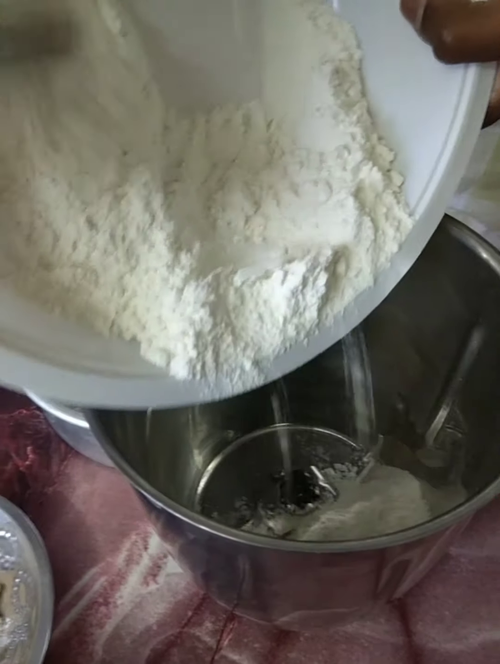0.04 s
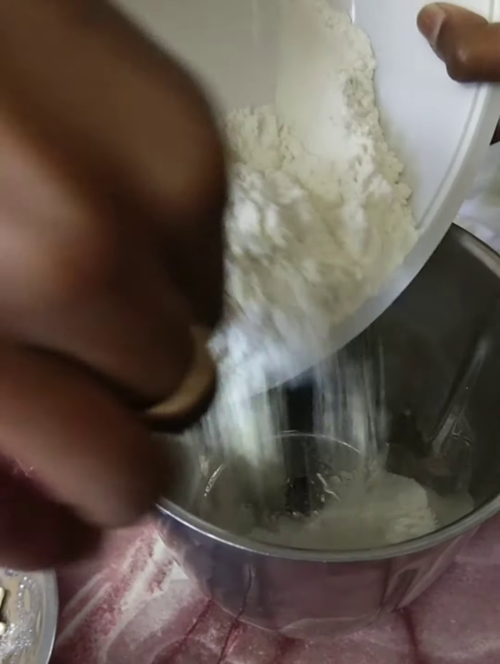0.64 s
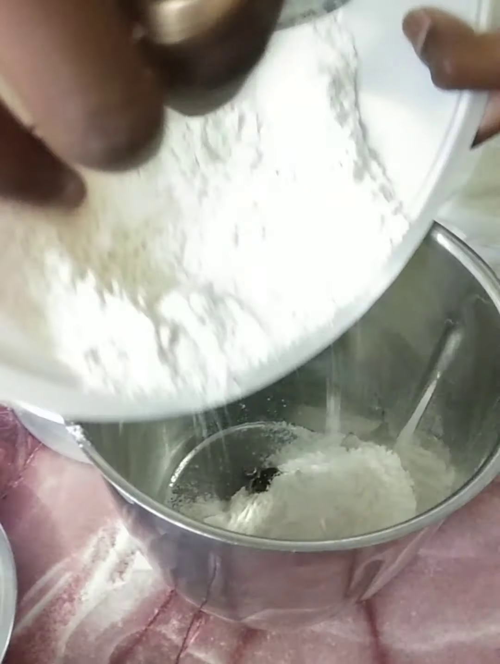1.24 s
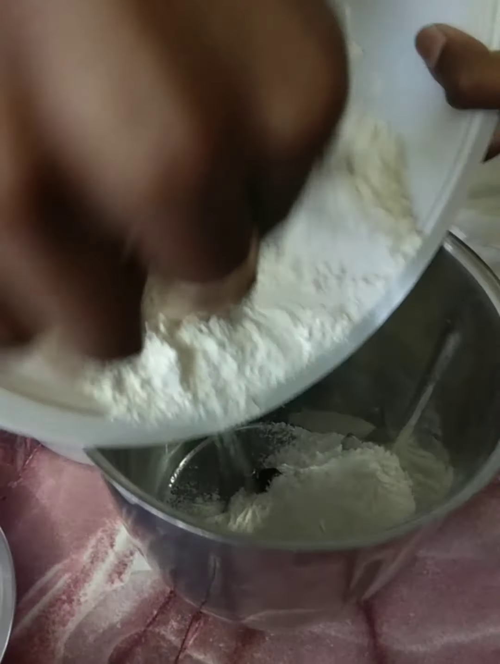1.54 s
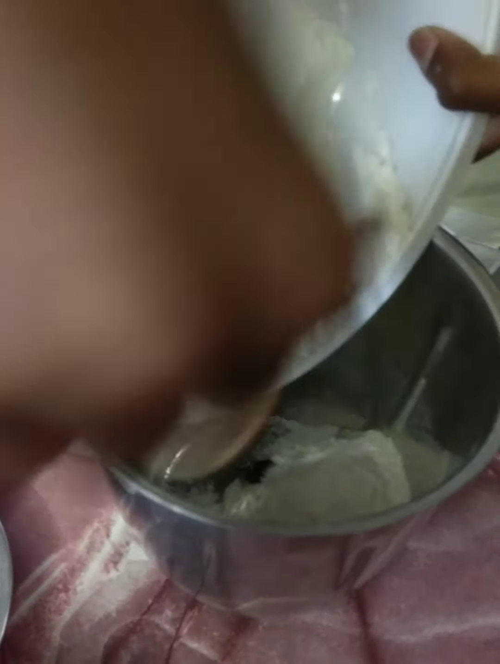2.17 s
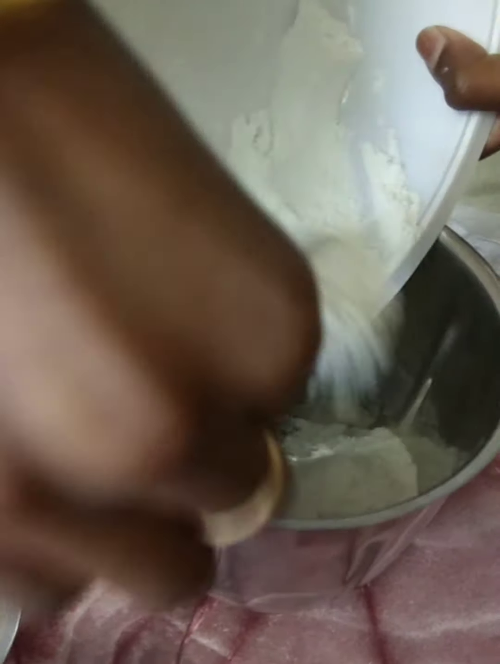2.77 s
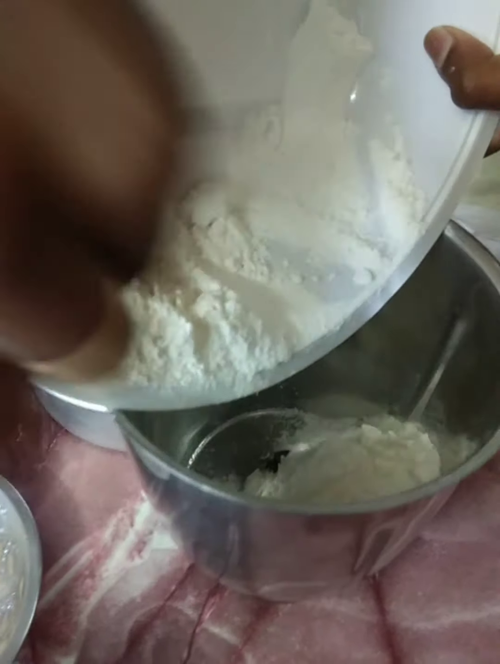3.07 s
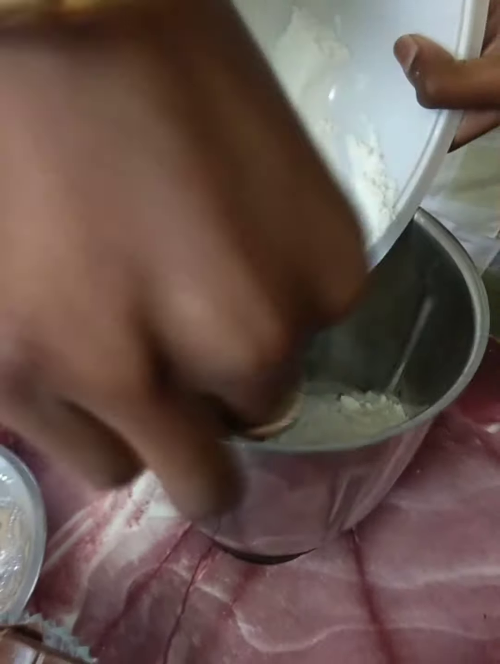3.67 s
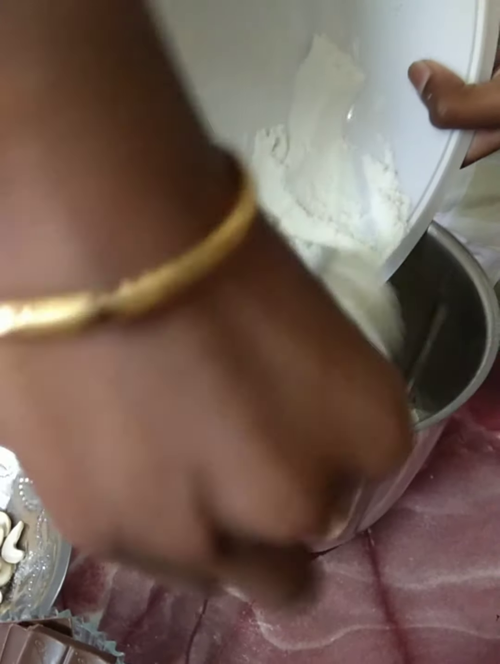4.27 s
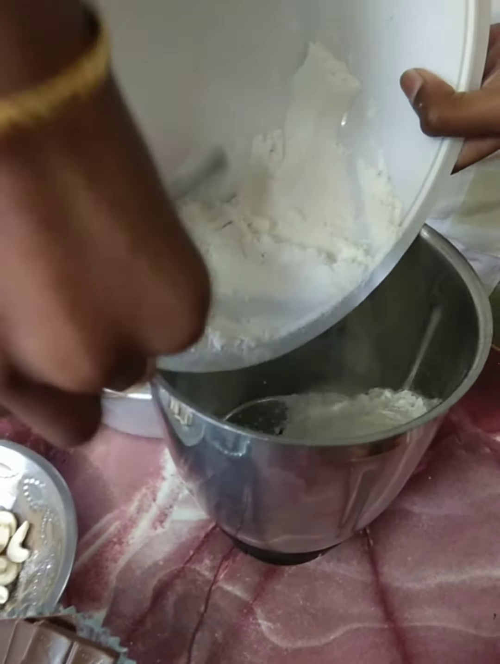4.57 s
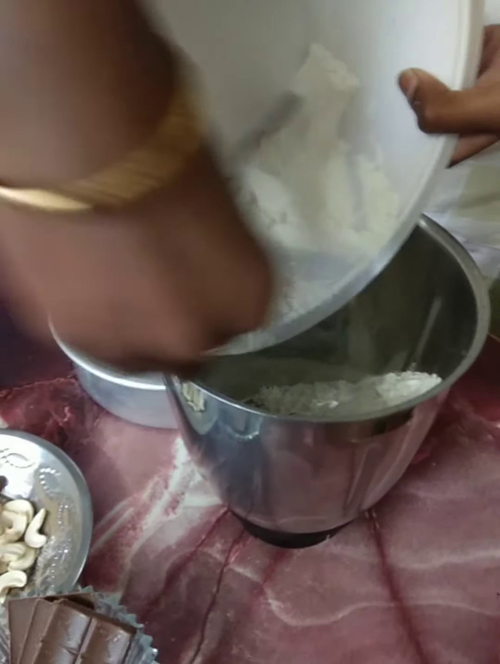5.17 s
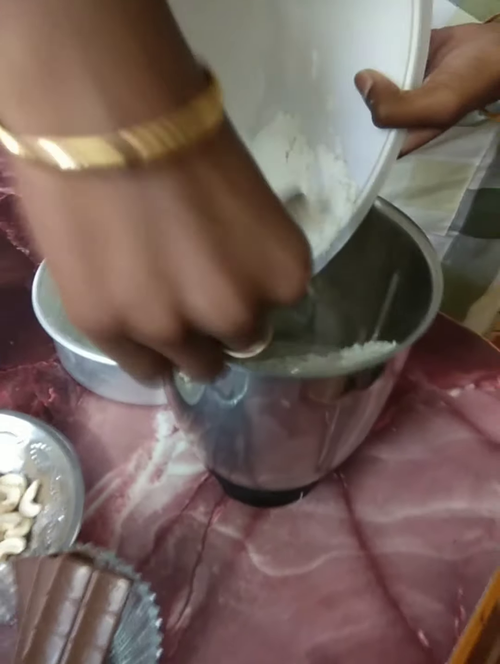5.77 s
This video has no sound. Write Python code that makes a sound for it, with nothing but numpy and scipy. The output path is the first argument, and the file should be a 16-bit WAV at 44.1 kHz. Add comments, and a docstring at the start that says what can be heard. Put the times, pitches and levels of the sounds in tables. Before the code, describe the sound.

Close up in a small kitchen, a spoon scoops flour from a plastic bowl into a stainless steel jar. Short, juddering scrapes with a gritty hiss alternate with uneven hollow knocks, plastic clacks and brief steel rings. The loudest clatter comes a little before halfway, followed by a thin, high squeal. More knocks and scrapes follow, one with a low thud into the worktop. Hard walls add a short echo over a very quiet background.

```python
"""A spoon scoops flour from a tilted plastic bowl into a stainless steel jar, close up in a small kitchen.
It judders over the plastic and shears the powder with a gritty hiss. Spoon, bowl and jar collide in
hollow knocks, plastic clacks and short steel rings; the hardest blows thud into the worktop.
The bowl rubs in the hand; there are faint squeaks, one steel squeal and one slide of loose flour.
Hard kitchen walls answer every blow, over a very quiet room tone."""
import sys
import numpy as np
from scipy import signal
from scipy.fft import rfft, irfft, next_fast_len
from scipy.io import wavfile
from scipy.ndimage import uniform_filter1d, map_coordinates

SR = 44100
rng = np.random.default_rng(int(sys.argv[2]) if len(sys.argv) > 2 else 0)


def generate_wav(sig):
    """Save sig (samples, or channels by samples) to the path in sys.argv[1] as 16-bit PCM at SR."""
    pcm = np.round(np.clip(np.atleast_2d(sig).T, -1, 1) * 32767).astype(np.int16)
    wavfile.write(sys.argv[1], SR, pcm)


N = 261072


def amp(db):
    """Decibels to gain."""
    return 10 ** (np.asarray(db) / 20)


def unit(x):
    """Scale to rms 1."""
    return x / np.sqrt(np.mean(x ** 2) + 1e-20)


def struck(x, size=512):
    """Scale a hit so that its attack has rms 1."""
    return x / np.sqrt(np.mean(x[:size] ** 2) + 1e-20)


def along(points, hz):
    """Read a (frequency, value) curve on a log axis."""
    knots_hz, values = np.transpose(points)
    return np.interp(np.log(hz + 1), np.log(knots_hz + 1), values)


def wobble(rate):
    """Smooth random modulation, rate knots a second."""
    return map_coordinates(rng.standard_normal(int(N * rate / SR) + 4), [np.arange(N) * rate / SR])


def filtered(x, response):
    """Apply a complex frequency response."""
    n = x.shape[-1]
    size = next_fast_len(n + SR // 10)
    return irfft(rfft(x, size) * response(np.fft.rfftfreq(size, 1 / SR)), size)[..., :n]


def coloured(x, spectrum, size=4096):
    """Minimum-phase EQ: shapes the tone without pre-ringing."""
    cepstrum = irfft(np.log(amp(along(spectrum, np.fft.rfftfreq(size, 1 / SR)))))
    cepstrum[1:size // 2] *= 2
    cepstrum[size // 2 + 1:] = 0
    return signal.oaconvolve(x, irfft(np.exp(rfft(cepstrum))))[:len(x)]


def gesture(start, length, attack, swell_db, t60):
    """Envelope of one movement: an attack, an arched hold and a dying release."""
    t = np.arange(N) / SR - start
    arch = np.sin(np.pi * np.clip(t / length, 0, 1))
    return np.clip(t / attack, 0, 1) * amp(swell_db * (arch - 1) - 60 * np.maximum(t - length, 0) / t60)


def ring(modes, t, scatter_db):
    """Decaying (Hz, dB, t60) modes whose strengths vary with where the blow lands."""
    hz, db, t60 = np.transpose(modes)[:, :, None]
    strength_db = db + scatter_db * rng.standard_normal(hz.shape)
    polarity = (-1) ** np.arange(len(hz))[:, None]
    attack = 1 - np.exp(-t / 0.0004)
    partials = polarity * amp(strength_db - 60 * t / t60) * np.sin(2 * np.pi * hz * t)
    return attack * partials.sum(axis=0)


def chatter(t, length, t60, rate=2500):
    """A tap and a brief rattle of uneven contacts that dies away."""
    taps = (rng.random(len(t)) < rate / SR) * rng.standard_normal(len(t))
    taps += 0.02 * rng.standard_normal(len(t))
    taps[0] = 0.65
    return taps * amp(-60 * np.maximum(t - length, 0) / t60)


def slips(rate, spread_db, smooth):
    """Stick-slip friction: tiny impulses of uneven size over an even rub."""
    grains = (rng.random(N) < rate / SR) * rng.standard_normal(N)
    grains *= amp(spread_db * rng.standard_normal(N))
    return unit(grains) + smooth * rng.standard_normal(N)


def roaming(x, patchy_db, size=9):
    """Resonances come and go as the point of contact travels."""
    spectra = signal.stft(x, nperseg=512)[2]
    patches = uniform_filter1d(rng.standard_normal(spectra.shape), size // 2, axis=0)
    patches = uniform_filter1d(patches, 4 * size, axis=1)
    return unit(signal.istft(spectra * amp(patchy_db * unit(patches)), nperseg=512)[1][:N])


# Reverb decay of the kitchen: (frequency [Hz], t60 [s])
KITCHEN_DECAY = [(100, 0.51), (500, 0.33), (1500, 0.3), (4000, 0.28), (12000, 0.3), (16000, 0.11)]
def placed(x, wet_db, lag_s):
    """Sound arrives on the right first; the kitchen adds a diffuse tail to each side."""
    hz, t, noise = signal.stft(rng.standard_normal((2, SR * 3 // 5)), SR, nperseg=256)
    decay = amp(-60 * t / along(KITCHEN_DECAY, hz)[:, None])
    build_up = 1 - np.exp(-t / 0.0019)
    tail = signal.istft(noise * decay * build_up, SR, nperseg=256)[1]
    room = signal.fftconvolve(x[None], tail, axes=1)[:, :len(x)]
    room *= np.linalg.norm(x) / (np.linalg.norm(room, axis=1, keepdims=True) + 1e-20)
    direct = filtered(x, lambda hz: np.exp(np.outer([-1, 1], 1j * np.pi * hz * lag_s)))
    return direct + amp(wet_db) * room


def cupped(x, depth, count, delay_s=0.004):
    """The walls of bowl and jar send each side its own early reflections."""
    delays = rng.uniform(0.1, 1, (2, count)) * delay_s
    gains = depth * rng.choice([-1, 1], (2, count)) / np.sqrt(count)
    echoes = np.zeros((2, SR // 20))
    np.put_along_axis(echoes, np.round(delays * SR).astype(int), gains, axis=1)
    return signal.oaconvolve(x[None], echoes, axes=1)[:, :len(x)]


def travelling(low, bright, size=8192):
    """The spoon moves, so its echoes keep changing; only the bright layer gets early reflections."""
    out, hop = np.zeros((2, N + 2 * SR)), size // 2
    window = np.sqrt(signal.get_window("hann", size))
    padded = np.pad([low, bright], ((0, 0), (hop, size)))
    for start in range(0, N + hop, hop):
        dull, sharp = np.pad(padded[:, start:start + size] * window, ((0, 0), (0, SR // 3)))
        piece = placed(dull + sharp, wet_db=0.5, lag_s=0.0002416) + cupped(sharp, depth=2.01, count=24)
        out[:, start:start + piece.shape[1]] += piece
    return out[:, hop:hop + N]


# Spoon strokes, levels before the layer trims:
# (start [s], length [s], attack [s], drag [dB], wall's share of the drag [0-1], rasp [dB], hiss [dB])
SPOON_STROKES = [(-0.04, 0.075, 0.014, -36.5, 0.96, -43, -46),
                 (0.018, 0.21, 0.022, -49.5, 0.9, -57.5, -52.5),
                 (1.341, 0.2, 0.022, -53, 0.2, -57.5, -48.5), (1.534, 0.15, 0.027, -57, 0.53, -59, -57),
                 (2.014, 0.13, 0.11, -48.5, 0.7, -45, -37), (2.451, 0.08, 0.023, -34.5, 0.55, -39, -34.5),
                 (2.564, 0.19, 0.047, -53.5, 0.1, -59, -53), (3.44, 0.15, 0.079, -50, 0.67, -59.5, -40.5),
                 (3.924, 0.092, 0.026, -51, 0.63, -59, -43.5), (4.017, 0.15, 0.017, -47, 0.62, -58, -44.5),
                 (4.173, 0.058, 0.036, -47.5, 0.35, -45, -39.5),
                 (4.237, 0.024, 0.021, -49, 0.1, -49, -54.5), (4.629, 0.19, 0.12, -48, 0.1, -46, -40.5),
                 (5.06, 0.19, 0.014, -47, 0.07, -58, -46), (5.182, 0.11, 0.023, -45.5, 0.36, -45.5, -47),
                 (5.265, 0.14, 0.027, -46, 0.13, -45.5, -42), (5.565, 0.16, 0.077, -40, 0.18, -45.5, -40)]
# The bowl slides on the jar's rim, sounding the hollow: (start [s], length [s], level before trim [dB])
RIM_SLIDES = [(0.405, .17, -64), (0.62, 0.58, -66), (1.035, 0.13, -64.5), (4.257, 0.11, -51),
              (5.848, 0.07, -57.5)]
# EQ of the hollow, the bowl's wall, the spoon's rasp and the powder's hiss: (frequency [Hz], level [dB])
HOLLOW_EQ = [(60, -54.5), (330, -19.5), (410, -6.5), (480, 5), (550, 3.5), (650, -9), (900, -37.5),
             (2000, -52.5), (10000, -100)]
WALL_EQ = [(60, -64), (300, -33), (560, -10.5), (700, -2), (800, 2), (900, -1.5), (1080, -17),
           (2000, -37.5), (10000, -100)]
RASP_EQ = [(100, -69.5), (500, -27.5), (1050, -15), (1450, 3.5), (1950, -1.5), (2400, -1), (2800, -4.5),
           (3200, -10), (4400, -9.5), (6000, -38.5), (16000, -80.5)]
POWDER_EQ = [(100, -71), (900, -47), (2500, 1), (3600, 0.5), (4700, 7.5), (6000, 6), (9000, 6),
             (11000, 6.5), (12300, 6), (14000, 5.5), (16000, -5)]
def scraping(swell_db=6, release_t60=0.13):
    """The spoon judders over plastic and shears powder, giving a low drag and a bright rasp and hiss."""
    hollow, wall, rasp, hiss = np.zeros((4, N))  # envelopes
    for start, length, attack, drag_db, wall_share, rasp_db, hiss_db in SPOON_STROKES:
        pressure = gesture(start, length, attack, swell_db, release_t60)
        hollow += amp(drag_db) * np.sqrt(1 - wall_share) * pressure
        wall += amp(drag_db) * np.sqrt(wall_share) * pressure
        rasp += amp(rasp_db) * pressure
        hiss += amp(hiss_db) * pressure
    for start, length, db in RIM_SLIDES:
        hollow += amp(db) * gesture(start, length, attack=0.0072, swell_db=swell_db, t60=release_t60)
    judder = wobble(70)
    rub = slips(rate=500, spread_db=3, smooth=0.22)
    body = hollow * unit(coloured(rub, HOLLOW_EQ)) + wall * unit(coloured(rub, WALL_EQ))
    drag = amp(-4.5) * unit(amp(2 * judder)) * body
    grit = amp(2 * judder) * coloured(slips(rate=1000, spread_db=1, smooth=0.43), RASP_EQ)
    edge = amp(-6) * rasp * roaming(grit, patchy_db=2.5)
    grains = amp(judder) * coloured(slips(rate=3000, spread_db=2.5, smooth=0.25), POWDER_EQ)
    powder = amp(-11) * hiss * roaming(grains, patchy_db=2.7)
    return drag, edge + powder


# EQ of the background: (frequency [Hz], level [dB])
ROOM_TONE_EQ = [(25, -30.5), (120, -9), (320, -10.5), (480, -1.5), (700, -21), (1200, -14), (4000, -25.5),
                (9000, -25.5), (12000, -15), (13500, -38), (16000, -41.5)]
def room_tone():
    """A very quiet, wide bed of noise with a hollow colour."""
    return amp(-80) * unit(np.array([coloured(rng.standard_normal(N), ROOM_TONE_EQ) for _ in range(2)]))


# The spoon snags in mid-stroke: (time [s], level before trim [dB])
SPOON_CATCHES = [(0.011, -59), (0.063, -49), (0.152, -54), (0.186, -55), (0.232, -54), (2.068, -41),
                 (2.106, -45), (2.161, -55.5), (3.474, -73), (3.529, -57), (4.72, -48), (5.3, -48),
                 (5.338, -53), (5.607, -48)]
# EQ of a snag: (frequency [Hz], level [dB])
CATCH_EQ = [(300, -33.5), (800, -4), (1400, 3), (2600, 2), (5000, -15), (13000, -17), (16000, -24)]
def catches():
    """Short bursts of grit where the edge of the spoon sticks and jumps."""
    out, t = np.zeros(N + SR), np.arange(SR // 10) / SR
    for time, db in SPOON_CATCHES:
        grit = coloured(chatter(t, length=0.011, t60=0.018), CATCH_EQ)
        out[round(time * SR):][:len(t)] += amp(db - 4) * struck(grit)
    return out[:N]


def knock(modes, pitch_hz, t, grip=0.2):
    """A short, hollow note; the grip of the hand damps each mode differently every time."""
    soft_wall = signal.butter(2, (200, 1700), "bandpass", fs=SR, output="sos")
    tuned = [(ratio * pitch_hz, db, t60 * np.exp(grip * rng.standard_normal()))
             for ratio, db, t60 in modes]
    return struck(signal.sosfilt(soft_wall, ring(tuned, t, scatter_db=1.5)))


CONTACT_S = 0.0025  # how long a contact chatters at full strength
# Hits of spoon, bowl and jar; the pitches move as the bowl tilts. Levels before the layer trims:
# (time [s], hollow [Hz], hollow [dB], wall [Hz], wall [dB], clack [dB], click [dB], leftward pan [dB])
HITS = [(0.031, 513, -63, 810, -54, -45, -72, -15), (0.056, 506, -62, 820, -63, -54, -87, -8),
        (0.618, 454, -47, 710, -56, -80, -79, -6), (0.997, 535, -49.5, 766, -52.5, -69, -77.5, -4),
        (1.025, 532, -48.5, 689, -55, -80, -71.5, -1), (1.102, 537, -58, 690, -62.5, -80, -101.5, -8),
        (1.222, 493, -47, 656, -52, -58, -84, -9), (1.291, 534, -47, 796, -38.5, -28.5, -39, -7),
        (1.348, 487.5, -33.5, 640, -44, -31.5, -29, -4), (1.476, 448, -51, 756, -54, -52, -77, -13),
        (1.578, 437, -47, 765, -48.5, -49, -60.5, -10), (2.0, 524, -47.5, 713, -45, -30.5, -40.5, -4),
        (2.235, 443.5, -50, 776, -48.5, -53, -57, -9.5), (2.285, 462, -54, 730, -60.5, -64.5, -70.5, -0.5),
        (2.412, 453, -28, 706, -20, -17.5, -16.5, 2.5), (2.4163, 492, -16.5, 793, -29.5, -18, -18, -3),
        (2.425, 490.3, -24, 900, -32, -25, -24, -2), (2.611, 465, -40.5, 746, -42.5, -38, -42, -9),
        (2.831, 452, -45, 795, -49, -51.5, -64, -8), (2.897, 528, -55.5, 731, -57.5, -65, -80, -3),
        (3.053, 479, -25.5, 713, -30, -26.5, -40.5, -6), (3.423, 476, -60.5, 720, -64, -68.5, -49.5, -5),
        (3.884, 496, -42.5, 800, -40, -35.5, -39.5, -13), (3.891, 445, -38.5, 810, -36, -36.5, -32.5, 1.5),
        (4.269, 510, -41, 733, -49.5, -46.5, -53.5, -5.5), (4.513, 485, -28.5, 783, -25, -22.5, -19.5, -4),
        (4.544, 454, -45, 830, -41, -31.5, -48, 10), (4.606, 481, -38.5, 830, -43, -62, -65, -1),
        (5.065, 478, -35.5, 793, -31, -29, -36.5, -6), (5.232, 437, -36, 740, -38, -35, -42.5, -4.5),
        (5.547, 473, -39.5, 769, -38, -55, -55, -6), (5.641, 489, -33.5, 747, -32.5, -34, -39, -2),
        (5.687, 535.5, -37.5, 737, -64, -56, -51, 2), (5.854, 458, -49.5, 746, -59, -53.5, -62, -2)]
# Modes of the hollow between bowl and jar, and of the bowl's wall: (pitch [ratio], level [dB], t60 [s])
HOLLOW_RESONANCES = [(0.9, -8.5, 0.04), (1, 1, 0.085), (1.12, -13, 0.043)]
WALL_RESONANCES = [(0.87, -5, 0.015), (1, -0.5, 0.044), (1.12, -8, 0.035), (1.38, -10.5, 0.045)]
# EQ of the plastic clack and the steel click: (frequency [Hz], level [dB])
CLACK_EQ = [(150, -36.5), (500, -5), (900, -4.5), (1150, -6), (1500, -1), (1900, -10.5), (2300, -4),
            (2650, -11.5), (3400, -8), (4500, -26.5), (9000, -45), (18000, -79.5)]
CLICK_EQ = [(800, -36.5), (2500, -11.5), (4000, -2.5), (5200, -2.5), (7200, -5.5), (9200, -1), (10800, -6),
            (12200, -6), (13800, 3), (15000, -12), (16500, -22.5)]
# Partials of the steel jar, damped by flour and bowl: (frequency [Hz], level [dB])
JAR_PARTIALS = [(1387, -1), (2230, -1), (2330, 1), (2760, 0), (3500, -6), (4342, -1), (4960, -2),
                (8900, -4), (9961, 0), (11222, -3), (12052, 3), (12198, 0), (12327, -2), (13782, 2)]
def blows(jar_t60=0.14, bright_pan_share=0.19):
    """Each contact knocks the hollow and the wall, topped by a plastic clack, a steel click and a ring."""
    out, t = np.zeros((2, N + SR)), np.arange(SR * 3 // 4) / SR
    jar_modes = [(hz, db, jar_t60) for hz, db in JAR_PARTIALS]
    for time, hollow_hz, hollow_db, wall_hz, wall_db, clack_db, click_db, pan_db in HITS:
        hollow = amp(hollow_db) * knock(HOLLOW_RESONANCES, hollow_hz, t)
        body = placed(hollow, wet_db=-6.5, lag_s=0.00027)
        wall = amp(wall_db) * knock(WALL_RESONANCES, wall_hz, t)
        body += placed(wall, wet_db=-5, lag_s=0.0003)
        clack = amp(clack_db - 8.5) * struck(coloured(chatter(t, CONTACT_S, t60=0.0058), CLACK_EQ))
        click = amp(click_db - 8) * struck(coloured(chatter(t, CONTACT_S, t60=0.02), CLICK_EQ))
        jar = amp(click_db - 15.5) * struck(ring(jar_modes, t, scatter_db=4))
        bright = clack + click + jar
        bright = placed(bright, wet_db=0, lag_s=0.00017) + cupped(bright, depth=1, count=7)
        sides_db = np.array([[pan_db / 2], [-pan_db / 2]])
        hit = amp(sides_db) * body + amp(bright_pan_share * sides_db) * bright
        out[:, round(time * SR):][:, :len(t)] += hit
    return out[:, :N]


# The bowl shifts in the hand: (start [s], length [s], level [dB])
GRIP_SHIFTS = [(0.281, 0.032, -60.5), (0.646, 0.041, -63), (0.996, 0.065, -54.5), (1.104, 0.11, -61),
               (1.278, 0.02, -42), (1.425, 0.072, -47.5), (1.521, 0.14, -61.5), (2.494, 0.24, -59.5),
               (2.824, 0.064, -62.5), (3.43, 0.067, -61), (3.881, 0.05, -48), (4.248, 0.042, -60),
               (4.527, 0.091, -57), (5.189, 0.11, -48.5), (5.303, 0.12, -70), (5.597, 0.14, -49),
               (5.788, 0.28, -63.5)]
# EQ of the hand's rub: (frequency [Hz], level [dB])
HANDLING_EQ = [(25, -34.5), (65, -23), (130, -3), (210, 3.5), (280, -5), (500, 0.5), (1200, -42),
               (8000, -100)]
def handling():
    """A soft, low rub of the bowl in the hand, when it shifts and when a blow jolts it."""
    shifts = sum(amp(db) * gesture(start, length, attack=0.029, swell_db=4.9, t60=0.26)
                 for start, length, db in GRIP_SHIFTS)
    jolts = [amp(-40.5 + 0.4 * click_db) * gesture(time, CONTACT_S, CONTACT_S, swell_db=0, t60=0.2)
             for time, *_, click_db, _ in HITS]
    envelope = np.hypot(shifts, np.max(jolts, axis=0))
    rub = unit(coloured(slips(rate=200, spread_db=2, smooth=1.5), HANDLING_EQ))
    return placed(envelope * rub, wet_db=-15, lag_s=0.0001)


# The spoon is struck on its edge: (time [s], level [dB])
EDGE_TAPS = [(0.057, -44.5), (1.292, -41.5), (1.35, -27.5), (3.89, -33.5), (5.642, -46)]
# Partials of the spoon: (frequency [Hz], level [dB])
SPOON_PARTIALS = [(2500, -20.5), (3500, -4), (4600, -4), (5100, -9.5), (6300, -1.5), (8300, -5),
                  (11000, -10.5), (13300, -10.5)]
def spoon_ticks(t60=0.0052):
    """The fingers damp the spoon, so its modes give only a brief, bright tick."""
    out, t = np.zeros(N + SR), np.arange(SR // 4) / SR
    modes = [(hz, db, t60) for hz, db in SPOON_PARTIALS]
    for time, db in EDGE_TAPS:
        out[round(time * SR):][:len(t)] += amp(db) * struck(ring(modes, t, scatter_db=2.5))
    return placed(out[:N], wet_db=-15, lag_s=0.000406)


# Faint, thin squeaks, and one high steel squeal as the spoon scrapes:
# (start [s], end [s], start pitch [Hz], end pitch [Hz], level [dB])
SQUEAKS = [(0.422, 0.52, 2680, 2740, -80), (0.525, 0.56, 3500, 3390, -68), (0.526, 0.563, 4970, 5200, -77),
           (0.96, 1.124, 1164, 1310, -63.5), (0.968, 1.106, 1785, 1944, -61),
           (0.989, 1.28, 2650, 2600, -71), (1.014, 1.27, 3960, 4020, -84.5),
           (1.163, 1.332, 3200, 2980, -67), (2.474, 2.551, 12400, 12000, -39)]
def squeaks():
    """Sliding plastic and scraping steel sing briefly on single, unsteady notes."""
    out, t = np.zeros(N), np.arange(N) / SR
    waver = 1 + 0.022 * wobble(400)
    for start, end, start_hz, end_hz, db in SQUEAKS:
        pitch_hz = np.interp(t, [start, end], [start_hz, end_hz]) * waver
        phase = 2 * np.pi * np.cumsum(pitch_hz) / SR
        swell = np.interp(t, [start, start + 0.19 * (end - start), end], [0, 1, 0])
        out += amp(db + 1.8 * wobble(100)) * swell * np.sin(phase)
    return placed(out, wet_db=-0.5, lag_s=0.00005)


# Low weight under the hard blows: (time [s], level [dB])
WORKTOP_THUDS = [(1.349, -56), (2.414, -41), (3.054, -57.5), (3.892, -69), (4.514, -38), (5.067, -66),
                 (5.642, -52)]
def thuds(pitch_hz=78, t60=0.03):
    """Hard blows push the jar against the worktop, each with one low, dead note."""
    out, t = np.zeros(N + SR), np.arange(SR // 4) / SR
    for time, db in WORKTOP_THUDS:
        out[round(time * SR):][:len(t)] += ring([(pitch_hz, db, t60)], t, scatter_db=-3)
    return placed(out[:N], wet_db=-15.5, lag_s=0.0003)


# EQ of sliding flour: (frequency [Hz], level [dB])
SWISH_EQ = [(300, -47.5), (1500, -7.5), (2500, 0.5), (4500, 2), (6500, -9.5), (9000, -19), (16000, -32)]
def flour_swish():
    """Loose flour slides down the wall in one soft, even hiss."""
    flow = gesture(start=4.85, length=0.081, attack=0.026, swell_db=1.5, t60=0.18)
    return amp(-61) * flow * unit(coloured(rng.standard_normal(N), SWISH_EQ))


# Stereo balance of the close sounds: (frequency [Hz], left minus right [dB])
BALANCE = [(100, -0.5), (300, 1.5), (500, 1.5), (1000, 1.5), (2500, 2), (6000, -2.5), (9000, 0.5),
           (12500, 6.5)]
def scene():
    """Mix the close sounds, pan them band by band and lay them over the room tone."""
    impacts = blows() + thuds() + spoon_ticks()
    drag, grit = scraping()
    scooping = travelling(drag, grit + catches() + flour_swish())
    scooping *= amp([[-0.7], [0.7]])  # a nudge to the right
    close = impacts + scooping + squeaks() + handling()
    return filtered(close, lambda hz: amp(np.outer([0.5, -0.5], along(BALANCE, hz)))) + room_tone()


def record(dry, ceiling=0.85, top_hz=16200):
    """A soft clip rounds the highest peaks, then a steep low-pass trims the top."""
    rounded = dry / (1 + (dry / ceiling) ** 6) ** (1 / 6)
    return filtered(rounded, lambda hz: np.clip((top_hz - hz) / 400 + 0.5, 0, 1))


dry = scene()
out = record(dry)
generate_wav(out)
```